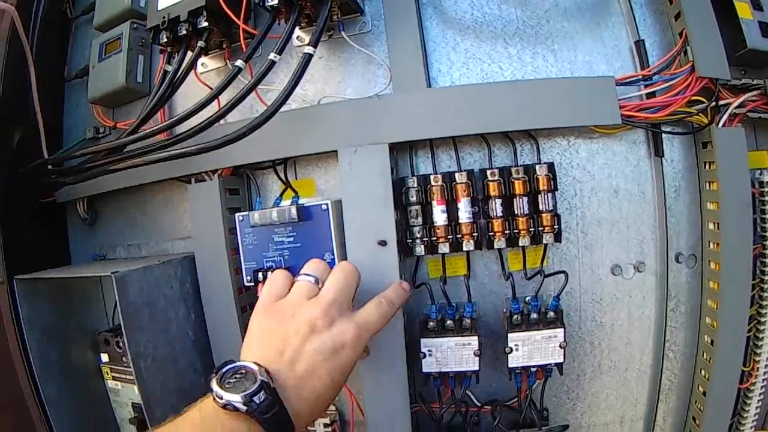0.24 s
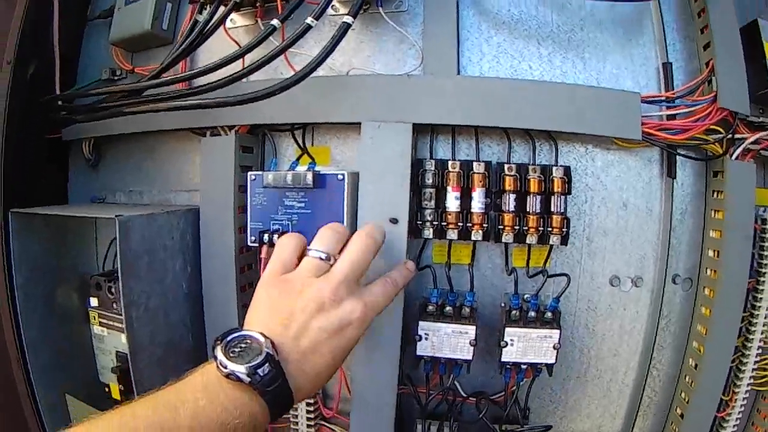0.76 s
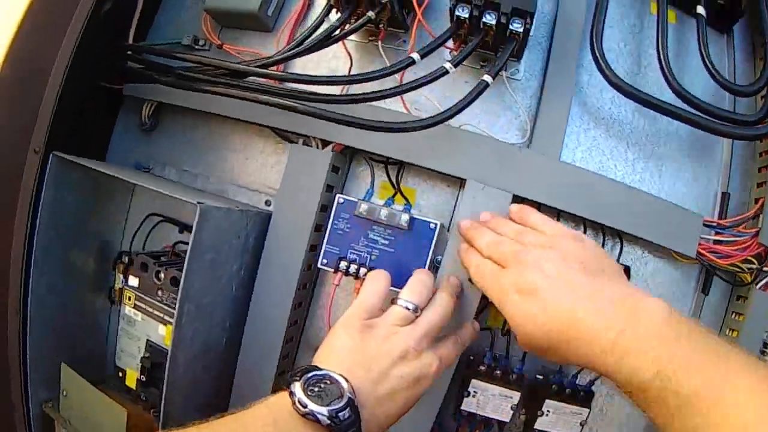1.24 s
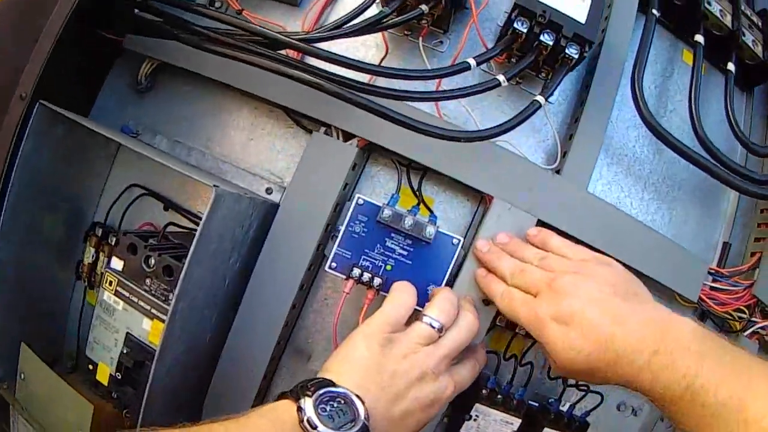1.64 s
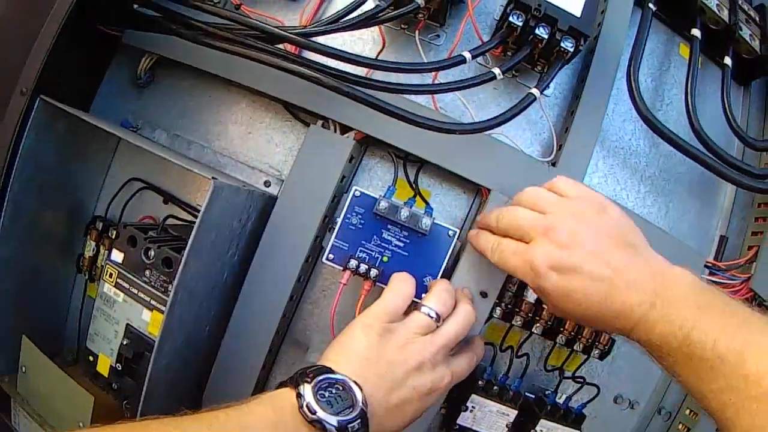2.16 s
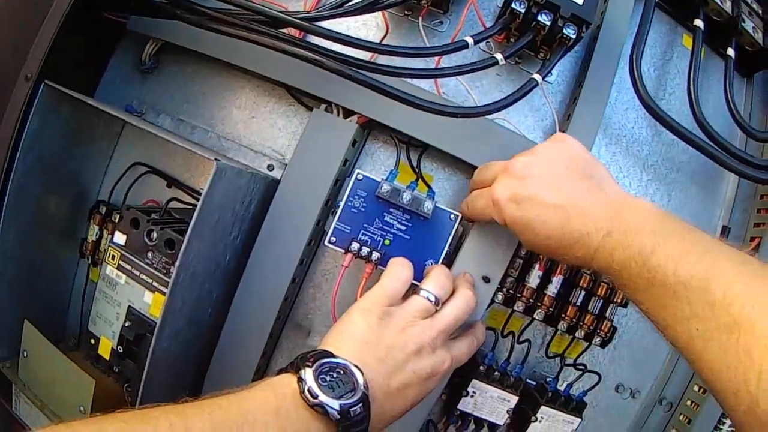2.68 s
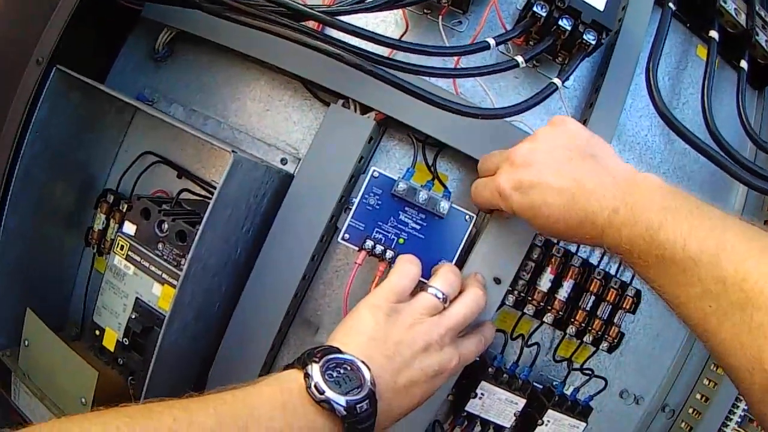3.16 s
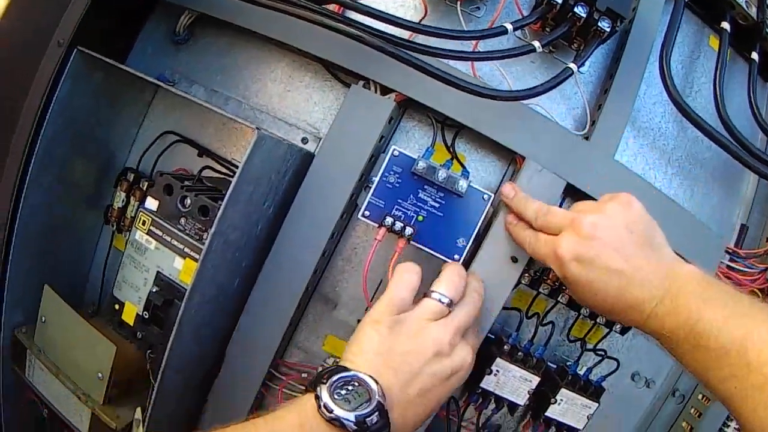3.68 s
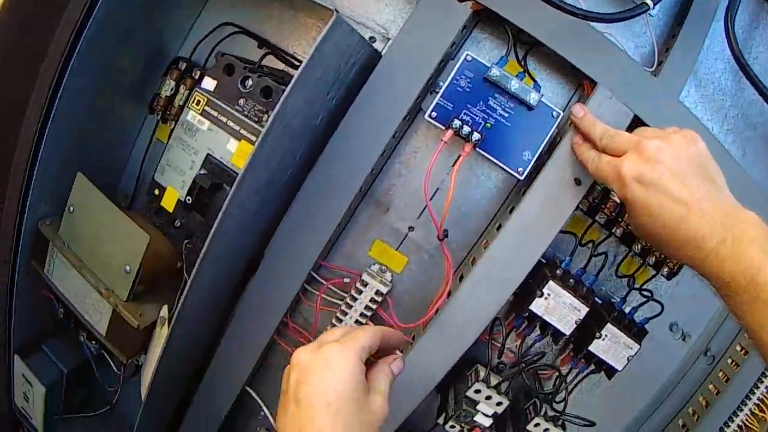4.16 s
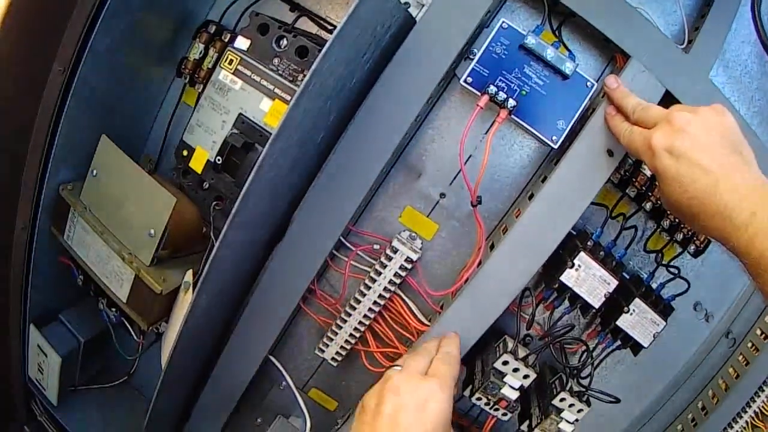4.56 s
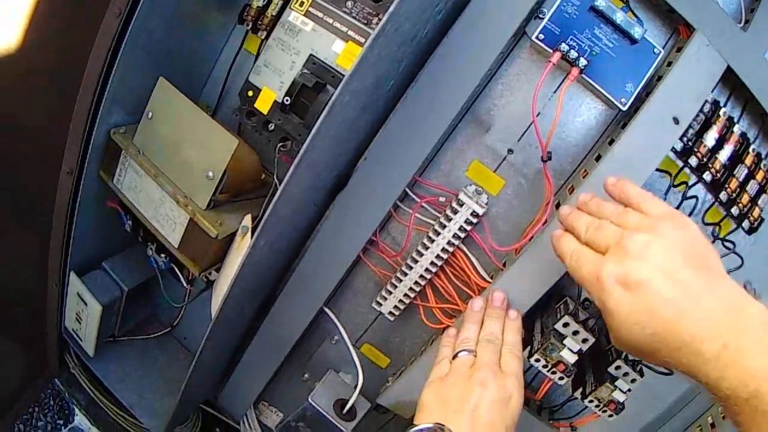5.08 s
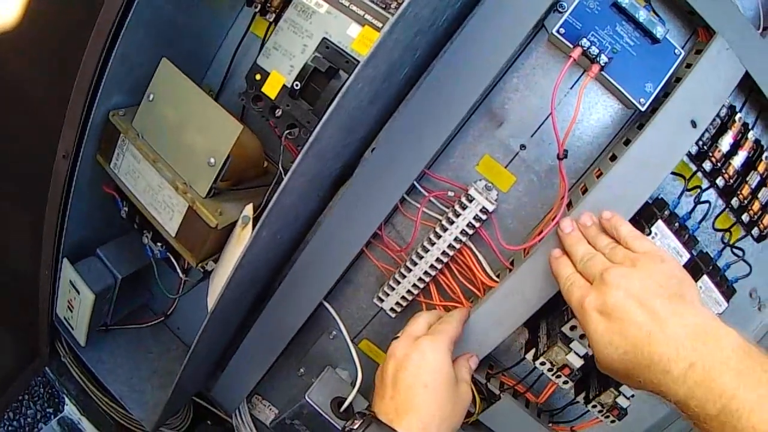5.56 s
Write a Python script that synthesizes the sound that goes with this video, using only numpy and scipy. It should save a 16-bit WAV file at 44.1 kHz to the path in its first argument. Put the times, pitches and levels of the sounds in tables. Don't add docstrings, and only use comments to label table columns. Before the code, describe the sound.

Uneven clusters of hard plastic clicks and dry ticks, plus one faint fuzzy squeak, over a constant low machine drone and airy rumble.

```python
import sys
import numpy as np
from scipy import signal
from scipy.io import wavfile
from scipy.ndimage import uniform_filter1d

SR = 44100
rng = np.random.default_rng(int(sys.argv[2]) if len(sys.argv) > 2 else 0)


def volts(x):
    e = np.asarray(x, float) / 20
    return 10 ** e


def transcribe(signal):
    frames = np.atleast_2d(signal).T
    limited = np.clip(frames, -1, 1)
    pcm = np.round(limited * 32767).astype(np.int16)
    wavfile.write(sys.argv[1], SR, pcm)


N = 257103
BLOCK = 2822

# mode_hz, width_hz, level_db
COVER_MODES = [(2595, 470, 0.5), (3116, 500, 0), (3460, 490, 0.5), (4010, 400, -3.5)]


def evened(x):
    return x / np.sqrt(np.mean(x ** 2) + 1e-20)


def peaked(x):
    return x / (abs(x).max() + 1e-12)


def read(points, hz):
    f, value = np.transpose(points)
    return np.interp(np.log(hz + 1), np.log(f + 1), value)


def add(mix, start_s, sound):
    part = mix[round(start_s * SR):][:len(sound)]
    part += sound[:len(part)]


def resonate(x, hz, width_hz):
    return signal.lfilter(*signal.iirpeak(min(hz, SR / 2.2), hz / width_hz, SR), x)


def ring(x, modes, detune):
    out = 0
    for k, (hz, width_hz, level_db) in enumerate(modes):
        out = out + (-1) ** k * volts(level_db) * resonate(x, hz * detune, width_hz)
    return out


def draw_chance():
    return rng.standard_normal(3500), rng.random(3500), rng.standard_normal(2)


def snap(peak_db, body_db, tab_db, body_hz, t60_s, chance):
    # mode_hz, width_hz, level_db
    tab_modes = [(4750, 370, -7), (5700, 880, 4.5), (8000, 1000, 2)]
    knocks_per_s = 3200
    jolt, pick, detune = chance
    t = (np.arange(len(jolt)) + 1) / SR
    decay_s = max(t60_s, .004)
    knocks = jolt * (pick < knocks_per_s / SR)
    knocks = knocks * volts(-60 * t / decay_s) * (1 - np.exp(-t / 0.0014))

    body = resonate(resonate(knocks, body_hz, 420), body_hz, 900)
    body += 0.19 * resonate(knocks, body_hz * 2.7, 210)
    body += 0.54 * resonate(knocks, body_hz * 0.79, 220)
    body += 0.35 * resonate(knocks, body_hz * .4, 100)

    walls = resonate(ring(knocks, COVER_MODES, 1 + .03 * detune[0]), 3200, 2400)
    walls = walls + 0.13 * resonate(knocks, 2200, 1500)

    scuff = jolt * volts(-42 * t / decay_s) * (1 - np.exp(-t / 0.0044))
    tab = resonate(ring(scuff, tab_modes, 1 + 0.083 * detune[1]), 7600, 4000)
    mixed = peaked(walls) + volts(body_db + 0.5) * peaked(body) + volts(tab_db + 7) * peaked(tab)
    return volts(peak_db) * mixed


def covers():
    # start_s, peak_db, body_db, pitch_hz
    snaps = [(0.0133, -29, 8.5, 855), (0.0195, -29.5, 11.5, 1294), (0.4505, -21.5, 5.5, 1116),
             (0.4544, -23.5, -6.5, 1320), (0.6374, -25.5, 2, 1050), (0.6919, -33, 10, 1080),
             (0.7017, -27.5, 6, 1180), (0.7262, -29.5, 2, 980), (0.7434, -42, 2, 872),
             (1.5838, -29.5, 8.5, 950), (1.6961, -25, 5.5, 990), (1.7095, -25, 11, 960),
             (1.7331, -25.5, 4, 1340), (1.7576, -26.5, 7.5, 1280), (1.7659, -27.5, -1.5, 1270),
             (2.3328, -25, 7, 1244), (2.3462, -24.5, 0.5, 935), (2.354, -35, 11.5, 1510),
             (2.8205, -29, 8.5, 1280), (2.829, -26, 6, 1370), (2.8419, -31, 7.5, 1360),
             (2.8856, -26.5, 7.5, 1350), (2.8904, -35, 2, 1290), (2.9145, -28, 9, 1276),
             (3.1507, -29, 7, 1294), (3.3304, -21, 0, 880), (4.3345, -26.5, 12.5, 1270),
             (4.3376, -19.5, 9, 1332), (5.0969, -33, 11.5, 1344), (5.438, -32, 5.5, 1580)]
    # start_s, peak_db, body_db,
    # pitch_hz
    touches = [
        (1.5144, -38, 10, 1230),
        (2.1842, -40, -5, 945),
        (2.2384, -40.5, 6, 890),
        (5.0381, -42.5, 9, 860),
    ]
    # start_s, tab_db, rattle_t60_s, settle_db
    presses = [(0, -34, 0.046, -10.5), (.4, -20, .045, -25), (.6, -26, 0.041, -16), (1.5, -18, .045, -20),
               (1.65, -14.5, 0.046, -11.5), (2.1, -14, 0.044, -21), (2.3, -11.5, 0.052, -16),
               (2.75, -14.5, 0.035, -12), (2.87, -12, 0.044, -12), (3.1, -12, 0.039, -10.5),
               (3.3, -10, 0.018, -15), (4.3, -24, 0.025, -26), (5, -8, .1, -20), (5.07, -19, .037, -21),
               (5.4, -26, .025, -14)]
    settle_s, settle_hz, settle_t60_s = .009, 890, .03
    settle_body_db, settle_tab_db = 6.5, 5
    out, starts = np.zeros(N), np.transpose(presses)[0]
    for start_s, peak_db, body_db, body_hz in [*snaps, *touches]:
        press = max(np.searchsorted(starts, start_s) - 1, 0)
        _, tab_db, t60_s, settle_db = presses[press]
        add(out, start_s, snap(peak_db, body_db, tab_db, body_hz, t60_s, draw_chance()))
        settling = snap(peak_db + settle_db, body_db + settle_body_db, tab_db + settle_tab_db,
                        settle_hz, settle_t60_s, draw_chance())
        add(out, start_s + settle_s * rng.uniform(0.56, 1.6), settling)
    return out


def slide():
    # start_s, level_db, slips_hz
    strokes = [
        (3.68, -66, 1060),
        (3.712, -62.5, 1060),
        (3.84, -55.5, 1060),
        (3.928, -57.5, 920),
        (3.97, -70, 1400),
        (3.98, -66.5, 900),
    ]
    s, level_db, slips_hz = np.transpose(strokes)
    t = np.arange(s[0], s[-1], 1 / SR)
    shake = evened(uniform_filter1d(rng.standard_normal(len(t)), size=60))
    turns = np.cumsum(np.interp(t, s, slips_hz) * (1 + .07 * shake)) / SR
    released = np.diff(np.floor(turns), prepend=0) > 0
    slips = released * rng.exponential(1, len(t))
    voice = evened(ring(slips, COVER_MODES, 0.75)) + volts(13.5) * evened(resonate(slips, 1150, 255))
    return s[0], voice * volts(np.interp(t, s, level_db)) * signal.windows.tukey(len(t), .2)


def tick(peak_db, bright_db):
    click = np.eye(1, 300)[0]
    low = peaked(resonate(click, 2300, 2500))
    high = peaked(resonate(click, 6700, 5500))
    return volts(peak_db + 1.5) * (low + volts(bright_db) * high)


def contacts():
    # start_s, peak_db, bright_db
    taps = [
        (0.966, -22, -2.5),
        (2.9605, -29, 3.5),
        (5.0974, -29.5, 10.5),
        (5.753, -23, -3),
    ]
    out = np.zeros(N)
    for start_s, *row in taps:
        add(out, start_s, tick(*row))
    return out


def cabinet(x):
    # band_hz, t60_s
    box_decay = [(500, 0.049), (1500, 0.08), (3500, .1), (8000, 0.057)]
    taps = np.zeros(8820)
    at = np.arange(60, 8800, 20) + rng.integers(0, 20, 437)
    taps[at] = rng.choice([-1., 1.], at.shape)
    hz, t, z = signal.stft(taps, SR, nperseg=128)
    decay = volts(-60 * t / read(box_decay, hz)[:, None])
    tail = signal.istft(z * decay, SR, nperseg=128)[1]
    return signal.fftconvolve(x, tail / np.linalg.norm(tail))[:N]


def head(t):
    # time_s, place (0 leaning in, 1 drawn back), roar_db
    head_path = [
        (0, 0.033, 1),
        (1.202, 0, 0),
        (1.8, 0.86, 0),
        (2.6, 0.59, -0.5),
        (3.5, 0.9, 0),
        (4.3, 0.62, 0),
        (4.999, 1, 1),
        (5.83, 1, 1.5),
    ]
    s, place, level_db = np.transpose(head_path)
    return np.clip(np.interp(t, s, place), 0, 1), np.interp(t, s, level_db)


def wander(t, top_hz):
    f = np.geomspace(top_hz / 20, top_hz, 12)
    return evened(np.sin(2 * np.pi * (f * t[:, None] + rng.random(12))) @ f ** -.5)


def compressor():
    # shaft_multiple, near_db (leaning in), far_db (drawn back), both rms
    orders = [(4, -56, -51), (6, -50, -43), (7, -61, -61), (8, -49, -62), (10, -55, -54), (11, -50, -47),
              (12, -49, -50), (13, -57, -59), (14, -57, -51), (15, -61, -57), (16, -57, -58),
              (17, -50, -53), (18, -60, -57), (19, -54, -55), (21, -59, -73), (22, -61, -59),
              (23, -58, -54), (24, -59, -65), (25, -63, -64), (26, -53, -52), (27, -56, -62),
              (28, -52, -52), (29, -59, -71), (30, -49, -47), (31, -61, -71), (32, -52, -51),
              (35, -69, -63)]
    shaft_hz = 28.104
    coarse, t = np.arange(0, N + 512, 256) / SR, np.arange(N) / SR
    place, out = head(coarse)[0], np.zeros(N)
    for k, near_db, far_db in orders:
        level = volts(near_db + (far_db - near_db) * place + 0.8 * wander(coarse, top_hz=1.52))
        slip = .15 * wander(coarse, top_hz=1) + 2 * np.pi * rng.random()
        phase = 2 * np.pi * round(k) * shaft_hz * t + np.interp(t, coarse, slip)
        out += np.interp(t, coarse, level) * np.sin(phase)
    return np.sqrt(2) * out


def fans():
    # band_hz, density_db (per Hz)
    near_roar = [(10, -28.5), (28, -24), (42, -1.5), (100, -5.5), (180, -9), (340, -8.5), (600, -14),
                 (850, -11), (1300, -16.5), (2400, -28.5), (4400, -35.5), (7500, -41.5)]
    # band_hz, density_db (per Hz)
    far_roar = [(10, -27.5), (28, -15.5), (42, -6.5), (100, -5), (165, -0.5), (200, -10.5), (310, -7.5),
                (600, -13.5), (850, -14.5), (1300, -17.5), (2400, -31.5), (4400, -40.5), (7500, -42)]
    # mode_hz, width_hz, near_db, far_db
    duct_booms = [(47, 21, 2, 8), (70.4, 17, 7.5, 3.5), (125, 6.2, 0, 3.5), (142.6, 15, 3, 1.5)]
    frames, hz = N // 1024 + 5, np.fft.rfftfreq(4096, 1 / SR)[:, None]
    a, b, patches = rng.standard_normal((frames, 2049, 3)).T
    patches = uniform_filter1d(patches, size=30, axis=0)
    patches = evened(uniform_filter1d(patches, size=4, axis=1))
    place, level_db = head(np.arange(frames) * 1024 / SR)
    colour = read(near_roar, hz) * (1 - place) + read(far_roar, hz) * place
    for f, width_hz, near_db, far_db in duct_booms:
        boom_db = near_db + (far_db - near_db) * place
        colour = colour + boom_db / (1 + (2 * (hz - f) / width_hz) ** 2)
    z = (a + 1j * b) * volts(colour + level_db + patches)
    return volts(-33.5) * evened(signal.istft(z, nperseg=4096, noverlap=3072)[1][:N])


def scene():
    hum = compressor() + fans()
    hands, ticks = covers(), contacts()
    add(hands, *slide())
    reflected = cabinet(volts(-6.5) * hands + volts(-6.5) * ticks)
    return (hum + hands + ticks + reflected)[None]


def casing(x):
    # band_hz, gain_db
    casing_gain = [(1500, -0.5), (1900, -4.5), (2300, -6), (2700, -4.5), (3100, 3.5), (3900, -6.5),
                   (4400, -10), (5200, -5.5), (6500, -8.5), (7600, -9), (8000, -11)]
    gain = np.log(volts(read(casing_gain, abs(np.fft.fftfreq(4096, 1 / SR)))))
    taps = np.fft.ifft(np.exp(np.conj(signal.hilbert(gain)))).real[:2048]
    return signal.oaconvolve(x, taps[None])[:, :N]


def shortage(share):
    drained_db, brace_db, lag_s, refill_s = 8.5, 9, 0.1, 0.16
    after = np.roll(uniform_filter1d(share, int(refill_s * SR)), int(lag_s * SR))
    return 2 + (drained_db * after + brace_db * np.roll(share, -BLOCK)) * (1 - share)


def rounded(x, short_db, size, above_db, below_db):
    # band_hz, step_db
    camera_step = [(1200, -90), (1900, -52), (2300, -44), (3000, -48), (4000, -57), (4450, -53),
                   (5000, -56), (6000, -58), (6900, -57), (7500, -61), (7800, -56), (8100, -54)]
    n, k, shift = np.arange(2 * size), np.arange(size), (size + 1) / 2
    window = np.sqrt(2 / size) * np.sin(np.pi * (n + .5) / (2 * size))
    blocks = np.lib.stride_tricks.sliding_window_view(x, 2 * size)[::size] * window
    spectra = np.fft.fft(blocks * np.exp(-1j * np.pi * n / (2 * size)))[:, :size]
    c = (spectra * np.exp(-1j * np.pi * shift * (k + .5) / size)).real

    hz = (k + .5) * SR / (2 * size)
    band = k * 88 // size
    drift = rng.standard_normal((len(c), band[-1] + 1))
    drift = 3 * evened(uniform_filter1d(drift, 2, axis=0))[:, band]
    treble = np.clip(hz / 2000 - 2.5, 0, 1)
    scarce = short_db[size::size][:len(c), None] * treble
    step = volts(read(camera_step, hz) + above_db + drift + scarce)
    near = uniform_filter1d(c ** 2, size // 88, axis=1)
    near = uniform_filter1d(near, BLOCK // size // 4 + 1, axis=0)
    step = np.maximum(step, volts(-below_db) * np.sqrt(abs(near)) * (hz > 1200))
    c = np.sign(c) * step * np.floor(abs(c) / step + .4)

    back = np.fft.ifft(c * np.exp(1j * np.pi * shift * k / size), 2 * size) * 2 * size
    back = (back * np.exp(1j * np.pi * (n + shift) / (2 * size))).real * window
    return (back[1:, :size] + back[:-1, size:]).ravel()


def thrifty(x):
    lead, size = 2 * BLOCK - 1544, BLOCK // 8
    x = np.pad(x[0], (lead, 3 * BLOCK))
    treble = resonate(resonate(x, 6500, 2500), 6500, 2500)
    power = uniform_filter1d(treble ** 2, size=size)
    before = np.roll(uniform_filter1d(power, size=4 * size), 3 * size)
    hit = power > volts(2 * 10.5) * before + volts(2 * -64.0)
    count = len(x) // BLOCK
    flag = np.repeat(hit[:count * BLOCK].reshape(count, BLOCK).any(1), BLOCK)
    share = uniform_filter1d(np.pad(flag, (0, BLOCK)) * 1., size=2 * size)[:len(x)]
    long = rounded((1 - share) * x, shortage(share), size=BLOCK, above_db=1, below_db=3)
    short = rounded(share * x, shortage(share), size=size, above_db=0, below_db=7)
    return (long[lead - BLOCK:][:N] + short[lead - size:][:N])[None]


def low_pass(x):
    return signal.sosfilt(signal.butter(12, 8790, fs=SR, output="sos"), x)


def record(dry):
    edge = signal.firwin(1023, 8020, window=("kaiser", 10), fs=SR)
    mix = signal.oaconvolve(thrifty(casing(dry)), edge[None], "same")
    return low_pass(mix)


dry = scene()
out = record(dry)
transcribe(out)
```